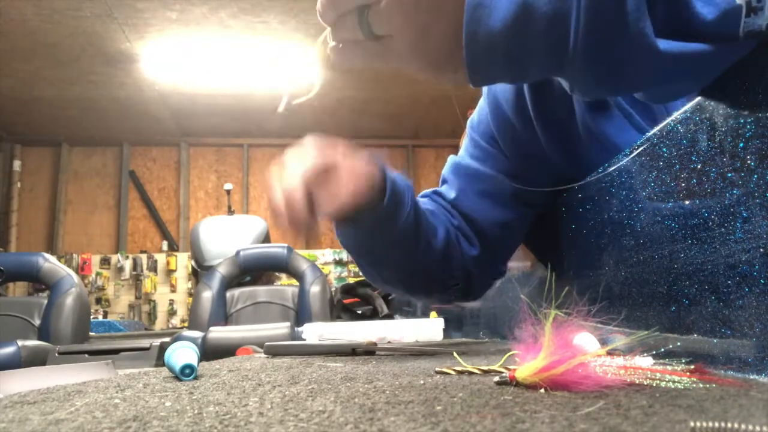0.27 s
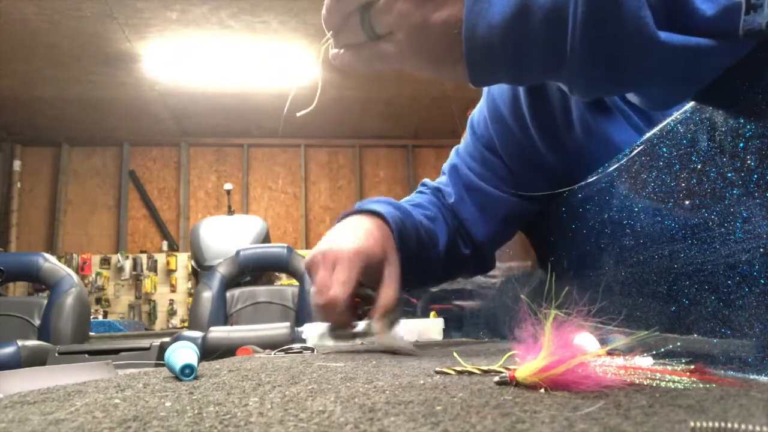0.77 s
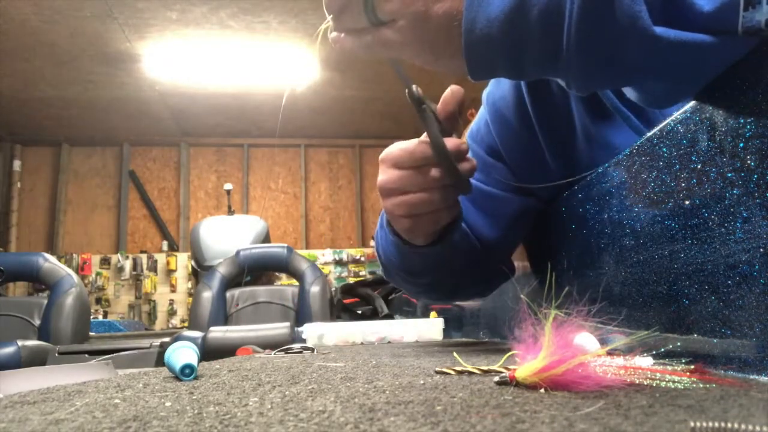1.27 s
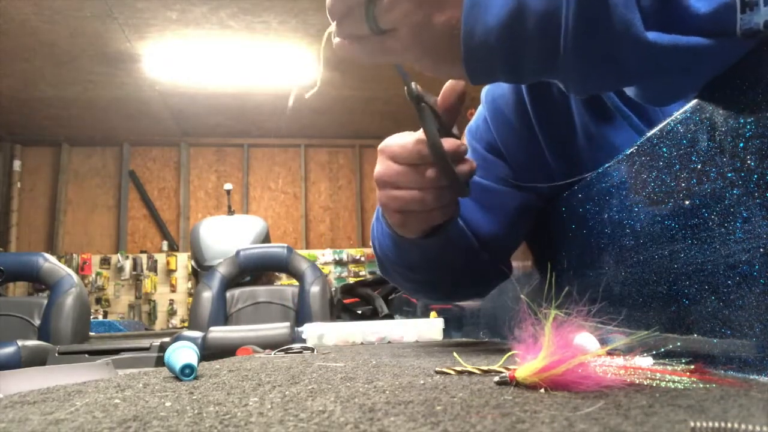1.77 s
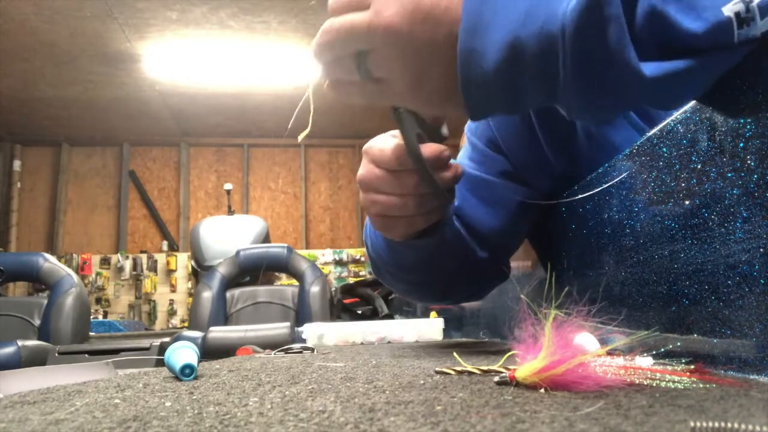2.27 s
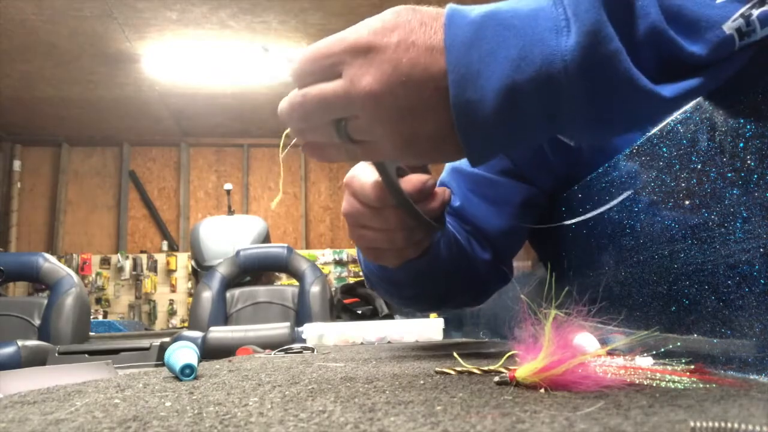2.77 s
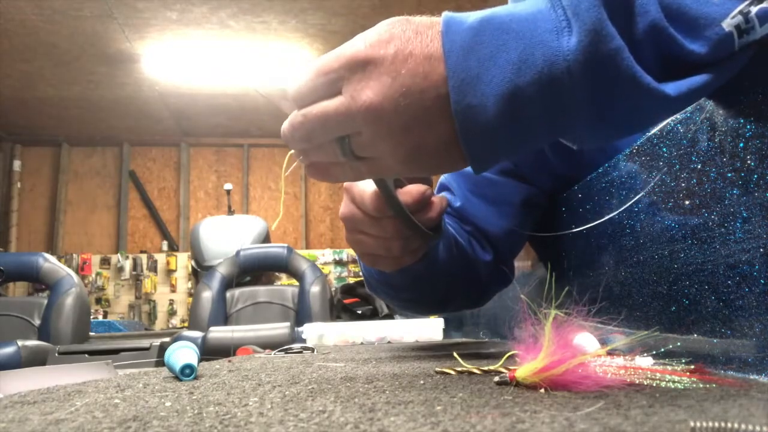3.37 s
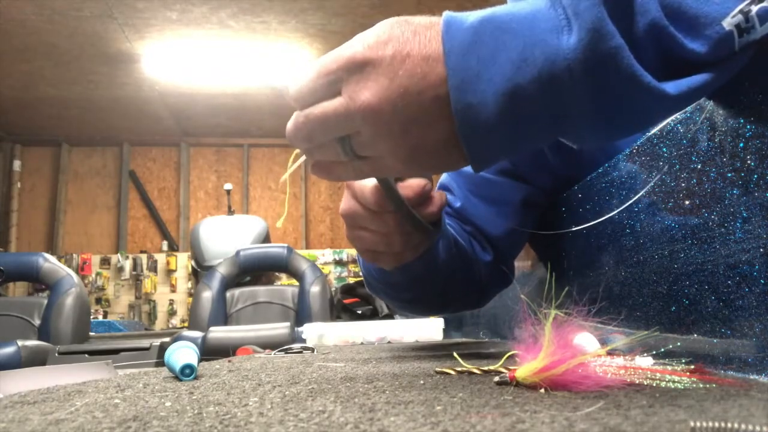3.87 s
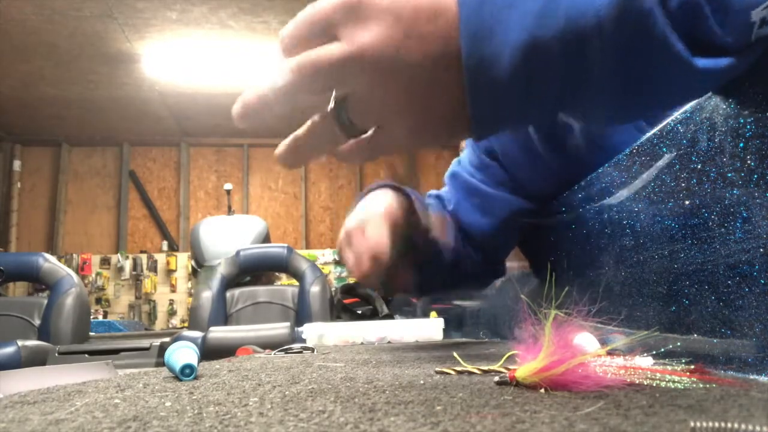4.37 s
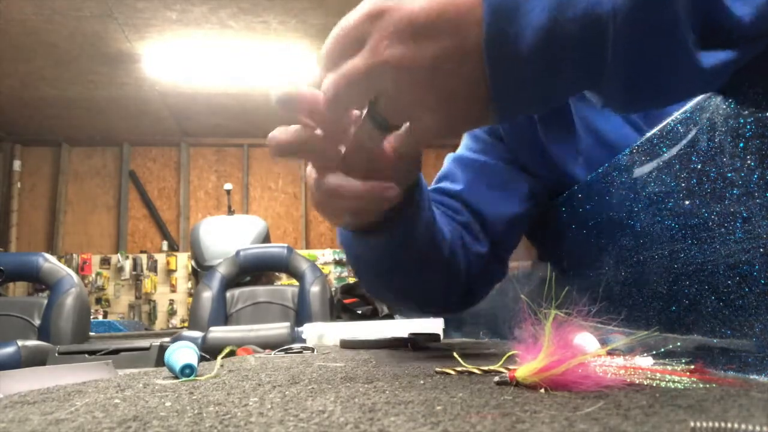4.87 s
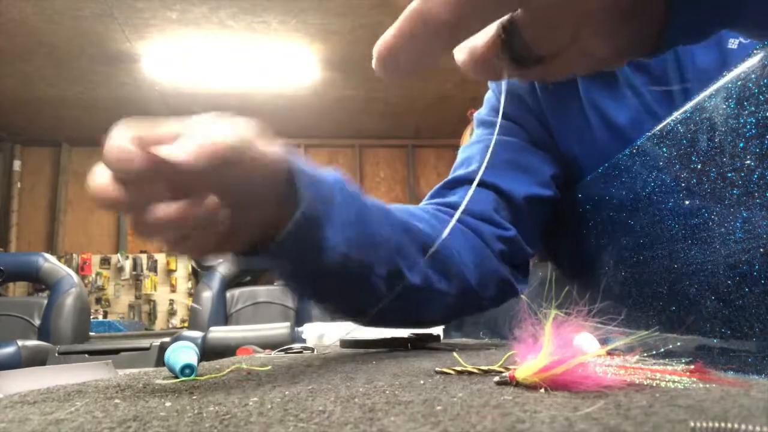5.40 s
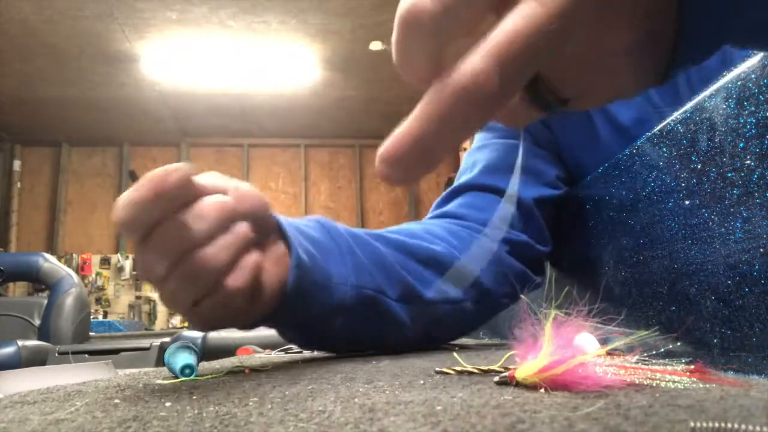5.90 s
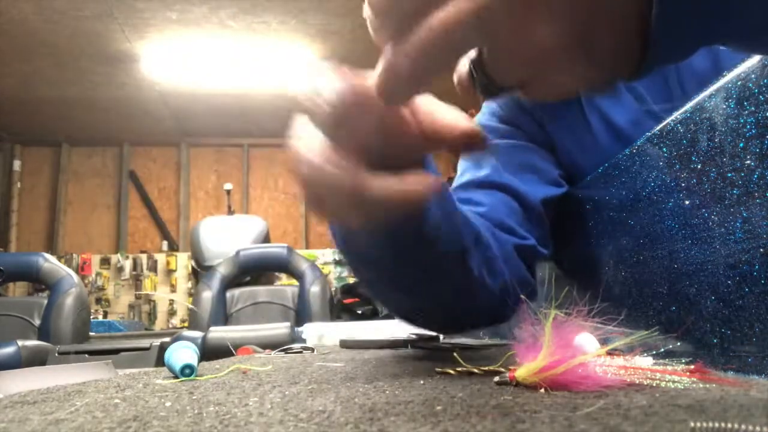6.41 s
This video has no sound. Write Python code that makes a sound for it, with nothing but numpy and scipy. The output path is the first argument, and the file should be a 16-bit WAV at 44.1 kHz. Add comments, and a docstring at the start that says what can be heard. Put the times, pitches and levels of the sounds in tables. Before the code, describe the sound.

Quiet garage air, low and steady with a faint hiss, heard by a phone resting on a carpeted boat deck. After a barely audible tick at 0.2 s, a sharp loud click lands at 0.43 s with fast weakening rebounds. Steel slides lightly, then from 0.59 s catches and scrapes harder in a stuttering drag, ending around 0.72 s with a bright click, hollow knock and short metal clink. Only faint ticks and whispery line and sleeve rubs follow. Tiny crisp snips come at 3.14 s and as a close pair at 3.88 and 3.91 s, each with a slight deck jolt. Near 4.17 s a very thin squeak falls in pitch, followed by ticks. At 4.54-4.72 s the clippers drop: hollow woody knocks, steel jingle, smaller bumps and short garage echo. Soft sleeve rustling swells around 5.1 s and continues intermittently to the end, with one minute tap at 5.9 s.

```python
"""Clippers on a boat deck

Steel clippers are picked up from a carpeted deck in a quiet garage, snip a fishing line and are dropped back.
Knocks and dragging reach a phone lying on the deck through the deck itself: dry, resonant, treble first.
The steel rings in bursts of tiny contacts, and its jingle also fills the garage with echo.
Shaped noise makes the faint sleeves, line and room air; a falling sine makes the line's thin squeak."""
import sys
import numpy as np
from scipy import signal
from scipy.fft import rfft, irfft
from scipy.io import wavfile
from scipy.ndimage import uniform_filter1d

SR = 44100
rng = np.random.default_rng(int(sys.argv[2]) if len(sys.argv) > 2 else 0)


def dump_mix(stems):
    """Bounce the given channels to the path in sys.argv[1] as a 16-bit WAV at rate SR."""
    frames = np.atleast_2d(stems).T  # one column per channel
    limited = np.clip(frames, -1, 1)  # hard clip at full scale
    pcm = np.round(limited * 32767).astype(np.int16)
    wavfile.write(sys.argv[1], SR, pcm)


N = 293160
TIME = np.arange(N) / SR

# blows on the deck from the clippers and the arm; a gap of 0 means no rebound:
# (time [s], click level [dB], click pitch [Hz], knock level [dB], knock pitch [Hz],
#  thump level [dB], gap to first rebound [s])
BLOWS = [(.4344, -16, 2050, -41, 600, -31.5, .0134), (.4745, -35.5, 1450, -50, 600, -40, 0),
         (.6466, -39.5, 1650, -31.5, 340, -33.5, .03), (0.7139, -29, 2100, -53, 400, -56, 0.0012),
         (.7224, -19, 2100, -31.5, 520, -45, 0), (.7705, -48.5, 1750, -55, 600, -64, 0),
         (4.5397, -32.5, 2900, -32, 680, -30, 0.0015), (4.5625, -20.7, 1060, -17.5, 560, -27, 0),
         (4.5834, -30.5, 1400, -30, 300, -31, 0), (4.613, -58, 900, -42, 380, -37, .009),
         (4.672, -54, 900, -47, 380, -39, 0), (4.7022, -44, 900, -32.5, 430, -33, 0),
         (4.7148, -54, 900, -33, 370, -32, 0), (5.8893, -66.5, 2200, -55.5, 330, -57, 0.00047)]
# the loose jaws and lever chatter: (time [s], length [s], level [dB], brightness [dB per octave])
RATTLES = [(4.5655, .022, -31.5, -4), (4.616, .018, -52.5, 7), (4.7035, 0.012, -46, 1)]
# the blades bite the line and meet, and the arm carries the jolt to the deck:
# (time [s], length [s], level [dB], jolt level [dB])
SNIPS = [(3.1425, .0012, -70, -62), (3.8815, 0.0027, -64.5, -58), (3.913, 0.005, -57, -58.5)]
# light ticks of the clippers and line in the fingers: (time [s], level [dB], brightness [dB per octave])
TICKS = [(.232, -76, 2), (1.185, -67.5, 6), (1.357, -76.5, 4), (4.199, -66, 7), (4.236, -66, -9)]
# tone of steel dragged over carpet: (frequency [Hz], relative level [dB])
DRAG_COLOUR = [(200, -11), (800, 0), (1300, 4.5), (2000, -4.5), (3500, -8.5), (4500, -20), (8000, -29),
               (15000, -40.5)]
# the line runs through the fingers: (middle time [s], half length [s], level [dB])
BRUSHES = [(1.09, .12, -75), (1.87, .2, -82), (4.33, .45, -81.5), (5.06, .04, -76), (5.455, .06, -77),
           (6.125, .05, -80)]
# the sleeves rustle as the arms move: (middle time [s], half length [s], level [dB])
SLEEVES = [(2.25, .35, -75.5), (3.45, .3, -71), (5.1, .45, -63), (5.7, .25, -69), (5.96, 0.14, -67),
           (6.35, 0.35, -64.5)]
# tone of the rubbing cloth: (frequency [Hz], relative level [dB])
SLEEVE_COLOUR = [(60, -14), (250, 5), (500, 1), (1200, -10.5), (2200, -14.5), (3000, -19), (4500, -16),
                 (8000, -29), (15000, -31.5)]
# resonances of the deck: (frequency [Hz], width [Hz], relative level [dB])
DECK_MODES = [(72, 18, 11.5), (108, 7.5, 9), (147.4, 16, 8), (222, 45, 8.5), (281, 22, 13), (404, 24, 12),
              (503, 35, -0.5), (575, 50, 6.5), (770, 59, 3), (946, 120, 7), (1186, 230, 6), (1530, 71, 4),
              (2020, 110, 1), (2430, 320, 1.5), (2857, 170, 3), (3500, 186.6, 3), (4730, 200, 3.5),
              (6910, 300, 0.5)]
# waves coming back from the deck's edges and struts: (delay [s], level [dB])
EDGE_RETURNS = [(.0016, -10), (.0039, -15), (.0057, -17)]
# resonances of the steel clippers: (frequency [Hz], width [Hz], relative level [dB])
CLIPPER_MODES = [(2650, 300, -5), (3890, 200, -2), (5080, 250, -6), (5840, 160, 3), (6300, 300, -2),
                 (7250, 300, 0), (8300, 250, -2), (8770, 120, 3), (10900, 400, -2), (12020, 250, -9),
                 (14300, 380, 3), (15100, 450, -1)]
# tone of the struck tool lying alongside: (frequency [Hz], relative level [dB])
NEIGHBOUR_COLOUR = [(400, -10), (1300, 2), (1900, -2.5), (2450, 0), (3300, 0), (4100, 2.5), (5250, -1.5),
                    (5550, -17), (8000, -18.5), (15000, -35.5)]
# garage echo: (frequency [Hz], time to fade by 60 dB [s], relative level [dB])
GARAGE_BANDS = [(80, 0.55, 6.5), (250, 0.52, 3), (704, .43, 0.5), (2000, 0.35, -6), (5000, 0.4, -1),
                (9000, .43, -3), (15000, 0.3, 1)]
# tone of the quiet room air: (frequency [Hz], relative level [dB])
ROOM_COLOUR = [(15, -56.5), (25, -26), (40, -10), (58, -5.5), (190, -1), (217, -4), (249, -1.5), (503, -9),
               (560, -10), (695, -15), (1130, -17), (1330, -22), (2110, -25.5), (7510, -31.5),
               (16000, -42.5)]

ROOM_DB = -65
TOP_HZ = 15750  # highest frequency the phone keeps
HIT_SIZE, LEAD = 16384, 64  # samples: room to compute a hit, and the part kept before its onset
ENERGY_S = .01  # a hit at 0 dB has the energy of a signal of rms 1 lasting this long

# each rebound keeps a share of the speed, so it comes sooner, weaker and duller; its thump fades slowly
REBOUND_SHARE, REBOUND_DB, REBOUND_PITCH_SHARE, REBOUND_THUMP_DB = .59, -3.5, .94, -2.5
# the hollow knock of the deck follows each click
KNOCK_Q, KNOCK_LAG_S = 1.6, .0033
# snip brightness in dB per octave; click and thump levels are relative to the jolt
SNIP_BRIGHT_DB, JOLT_CLICK_HZ, JOLT_CLICK_DB, JOLT_THUMP_DB = 2, 2200, -9, -8.5
TICK_S = 0.00331
# a neighbouring tool is struck as the hand lifts
CLINK_S, CLINK_DB = .7232, -41
# the clippers slide lightly over the deck, are gripped and drag harder, then lift off
SLIDE_S, GRIP_S, LIFT_S = 0.42, .586, .712
SLIDE_DB, GRIP_DB, DRAG_ATTACK_S, DRAG_RELEASE_S = -53, -45.7, 0.01, .015
# as the grip tightens the steel catches several times in a row; the low level is relative to the click
CATCH_GAP_S, CATCH_HZ, CATCH_DB, CATCH_SCATTER_DB, CATCH_LOW_DB = .0075, 1400, -40.5, 2.5, -17
BRUSH_HZ = 10000
# a thin squeak falls in pitch as the line slides out of the jaws
SQUEAK_S, SQUEAK_LENGTH_S, SQUEAK_HZ = 4.165, .07, 13900
SQUEAK_FALL_OCT_PER_S, SQUEAK_DB = 16, -73


def undb(db):
    """Turns decibels into a gain."""
    return 10 ** (np.asarray(db) / 20)


def freqs(size):
    """Frequencies of a spectrum in Hz, kept at 1 Hz or above."""
    return np.maximum(np.arange(size // 2 + 1) * SR / size, 1)


def band(f, hz, q):
    """Response of one resonance, gain 1 at its centre; a higher q is narrower."""
    return 1 / (1 + 1j * q * (f / hz - hz / f))


def body(f, modes):
    """Response of an object with several resonances, added together."""
    return sum(undb(db) * band(f, hz, hz / width) for hz, width, db in modes)


def colour(x, points):
    """Shapes the tone of x by a (Hz, dB) curve and sets its rms to 1."""
    hz, db = np.transpose(points)
    curve_db = np.interp(np.log(freqs(len(x))), np.log(hz), db)
    y = irfft(rfft(x) * undb(curve_db), len(x))
    return y / y.std()


def hit(spectrum, db):
    """Turns a spectrum into a short sound of set energy, keeping LEAD samples before its onset."""
    y = np.roll(irfft(spectrum), LEAD)[:HIT_SIZE // 2]
    return y * undb(db) * np.sqrt(ENERGY_S * SR / np.sum(y ** 2))


def add(out, s, x):
    """Mixes x into out with its onset at time s."""
    start = max(int(s * SR) - LEAD, 0)
    out[start:start + len(x)] += x[:max(N - start, 0)]


def grains(size, spread_db):
    """Noise that stands for countless tiny contacts of uneven strength."""
    strength = np.clip(rng.standard_normal(size), -2, 2)
    return rng.standard_normal(size) * undb(spread_db * strength)


def swells(events):
    """Gain that rises and falls smoothly around each movement."""
    gain = np.zeros(N)
    for s, half_length, db in events:
        gain += undb(db) * np.cos(np.pi / 2 * np.clip((TIME - s) / half_length, -1, 1)) ** 2
    return gain


def room_tone():
    """Low steady air noise under a faint hiss."""
    return colour(rng.standard_normal(N), ROOM_COLOUR) * undb(ROOM_DB)


def garage(x, build_s=0.0047, ceiling_s=.0215, ceiling_db=-11):
    """Adds a ceiling echo and a spread-out tail in which each frequency band fades at its own rate."""
    size = 2 * HIT_SIZE
    t, f = np.arange(size) / SR, freqs(size)
    hz, t60, db = np.transpose(GARAGE_BANDS)
    noise = rfft(rng.standard_normal(size))
    tail = np.zeros(size)
    # each row of np.eye picks one band, which overlaps its neighbours
    for share, decay, gain in zip(np.eye(len(hz)), t60, undb(db)):
        band_noise = irfft(noise * np.interp(np.log(f), np.log(hz), share))
        tail += gain * band_noise * np.exp(-np.log(1000) * t / decay)
    tail *= 1 - np.exp(-(t / build_s) ** 2)
    tail /= np.sqrt(np.sum(tail ** 2))
    tail[int(ceiling_s * SR)] += undb(ceiling_db)
    return signal.fftconvolve(x, tail)[:N]


def sleeves():
    """Cloth rubs on cloth and on the deck: uneven noise that swells with each movement."""
    return colour(grains(N, spread_db=5.5), SLEEVE_COLOUR) * swells(SLEEVES)


def brushes(q=0.64):
    """Soft swells of fine, high friction noise from the line."""
    rub = irfft(rfft(grains(N, spread_db=4.5)) * band(freqs(N), BRUSH_HZ, q), N)
    return rub / rub.std() * swells(BRUSHES)


def squeak(waver=.1):
    """The sliding line sings a falling, unsteady note."""
    since_start = np.clip(TIME - SQUEAK_S, 0, SQUEAK_LENGTH_S)
    glide = SQUEAK_HZ * 2 ** (-SQUEAK_FALL_OCT_PER_S * since_start)
    # smoothing the noise makes the actual waver smaller
    pitch = glide * (1 + waver * uniform_filter1d(rng.standard_normal(N), size=24))
    half = SQUEAK_LENGTH_S / 2
    return np.sin(2 * np.pi * np.cumsum(pitch) / SR) * swells([(SQUEAK_S + half, half, SQUEAK_DB)])


def clink(decay_s=0.0041):
    """The neighbouring tool rings once, as fading noise: its resonances are too dense to tell apart."""
    out = np.zeros(N)
    burst = grains(HIT_SIZE, spread_db=3.5) * np.exp(-TIME[:HIT_SIZE] / decay_s)
    add(out, CLINK_S, hit(rfft(colour(burst, NEIGHBOUR_COLOUR)), CLINK_DB))
    return out


def steel(events, crack_db, spread_db):
    """Bursts of tiny steel contacts ring the clippers."""
    f, out = freqs(HIT_SIZE), np.zeros(N)
    t = np.arange(HIT_SIZE) / SR
    ring = body(f, CLIPPER_MODES) + undb(crack_db) * band(f, hz=6050, q=0.56)
    for s, length, db, bright_db in events:
        burst = grains(HIT_SIZE, spread_db) * np.exp(-(t / length) ** 4)
        tilt = undb(bright_db * np.log2(f))
        add(out, s, hit(rfft(burst) * ring * tilt, db))
    return out


def drag(slip_db=3.0):
    """Steel catches and slips on the carpet every few milliseconds, louder once it is gripped."""
    def ramp(s, length):
        """Goes from 0 to 1, starting at time s."""
        return np.clip((TIME - s) / length, 0, 1)

    db = SLIDE_DB + (GRIP_DB - SLIDE_DB) * ramp(GRIP_S, DRAG_ATTACK_S)
    touch = ramp(SLIDE_S, DRAG_ATTACK_S) - ramp(LIFT_S, DRAG_RELEASE_S)
    slips = uniform_filter1d(rng.standard_normal(N), size=130)
    slip_gain = undb(slip_db * np.clip(slips / slips.std(), -1.5, 1.5))
    rub = grains(N, spread_db=5.5) * slip_gain
    return colour(rub, DRAG_COLOUR) * undb(db) * touch


def catches(count=6, knock_hz=330, uneven=.45, fade_db_per_s=50):
    """Uneven little blows as the dragged steel sticks and lets go, fading as it gets moving."""
    for k, (late, strength) in enumerate(rng.uniform(-1.2, 1, (count, 2))):
        after = CATCH_GAP_S * (k + uneven * late)
        db = CATCH_DB + CATCH_SCATTER_DB * strength - fade_db_per_s * after
        low_db = db + CATCH_LOW_DB
        yield GRIP_S + after, db, CATCH_HZ, low_db, knock_hz, low_db


def jolts(knock_hz=640):
    """The small blow that each snip sends down the arm to the deck."""
    for s, _, _, db in SNIPS:
        yield s, db + JOLT_CLICK_DB, JOLT_CLICK_HZ, db, knock_hz, db + JOLT_THUMP_DB


def rebounds(count=4):
    """Every blow, then its rebounds, each sooner and weaker as speed is lost."""
    for s, click_db, click_hz, knock_db, knock_hz, thump_db, gap in BLOWS:
        yield s, click_db, click_hz, knock_db, knock_hz, thump_db
        if gap <= 0:
            continue
        for k in range(1, count + 1):
            s = s + gap * REBOUND_SHARE ** (k - 1)
            loss_db = REBOUND_DB + 20 * np.log10(REBOUND_SHARE ** k)
            duller_hz = click_hz * REBOUND_PITCH_SHARE ** k
            weight_db = thump_db + k * REBOUND_THUMP_DB
            yield s, click_db + loss_db, duller_hz, knock_db + loss_db, knock_hz, weight_db


def knocks(blows, lag_s=0.0019, thump_hz=168, thump_q=.8, direct_db=0, crack_db=-50,
           soft_ratio=3.0, dull_hz=800, click_q=1.5):
    """Each blow is a hard click, a hollow knock and a soft thump that spread through the deck as bending waves."""
    f, out = freqs(HIT_SIZE), np.zeros(N)
    # treble travels faster: delay is lag_s * sqrt(1000 / f), less the same delay at TOP_HZ
    travel = np.exp(-2j * np.pi * lag_s * np.sqrt(1000) * (2 * np.sqrt(f) - f / np.sqrt(TOP_HZ)))
    returns = 1 + sum(undb(db) * np.exp(-2j * np.pi * f * delay) for delay, db in EDGE_RETURNS)
    deck = (undb(direct_db) + body(f, DECK_MODES)) * travel * returns
    thump = deck * band(f, thump_hz, thump_q) * band(f, hz=176, q=0.26) / (1 + 1j * f / dull_hz)

    def contact(hz, q):
        """The carpet cushions the contact and takes the top off."""
        push = band(f, hz, q) ** 2 + undb(crack_db)
        return deck * push * band(f, soft_ratio * hz, q=.7) / (1j * f)

    for s, click_db, click_hz, knock_db, knock_hz, thump_db in blows:
        add(out, s, hit(contact(click_hz, click_q), click_db) + hit(thump, thump_db))
        add(out, s + KNOCK_LAG_S, hit(contact(knock_hz, KNOCK_Q), knock_db))
    return out


def scene(boom_db=-16, knock_room_db=-28, rattle_room_db=-7, snip_room_db=-13, clink_room_db=1):
    """Every source arrives dry; the deck's boom, the deck and the steel also fill the garage with echo."""
    deck = knocks([*rebounds(), *catches(), *jolts()]) + drag()
    rattle = steel(RATTLES, crack_db=-5, spread_db=3.0)
    cuts = [(s, length, db, SNIP_BRIGHT_DB) for s, length, db, _ in SNIPS]
    ticks = [(s, TICK_S, db, bright_db) for s, db, bright_db in TICKS]
    snip = steel(cuts + ticks, crack_db=-2.0, spread_db=0.5) + squeak()
    ring = clink()
    boom = irfft(rfft(deck) * band(freqs(N), hz=303, q=0.37), N)
    airborne = undb(boom_db) * boom + undb(knock_room_db) * deck
    airborne += undb(rattle_room_db) * rattle + undb(snip_room_db) * snip + undb(clink_room_db) * ring
    direct = deck + rattle + snip + ring + brushes() + sleeves()
    return (direct + garage(airborne) + room_tone())[None]


def record(dry, low_hz=42):
    """The phone drops the deepest bass and cuts the top."""
    thin = signal.sosfilt(signal.butter(3, low_hz, "high", fs=SR, output="sos"), dry)
    return signal.sosfilt(signal.ellip(10, .2, 70, TOP_HZ, fs=SR, output="sos"), thin)


dry = scene()
out = record(dry)
dump_mix(out)
```